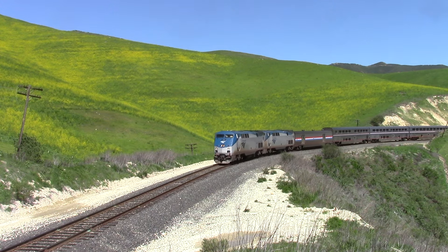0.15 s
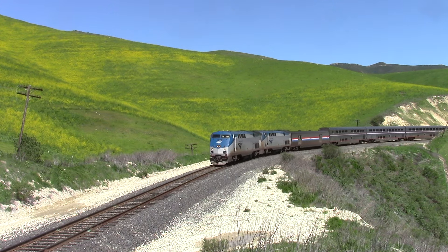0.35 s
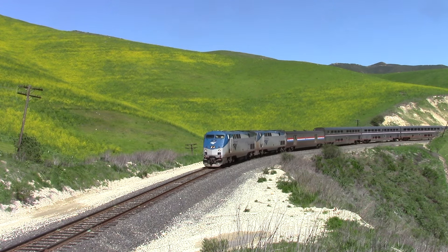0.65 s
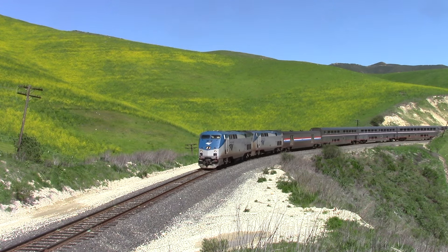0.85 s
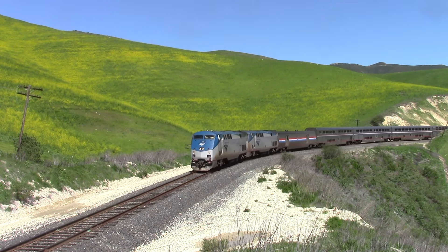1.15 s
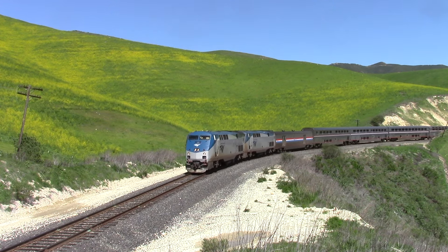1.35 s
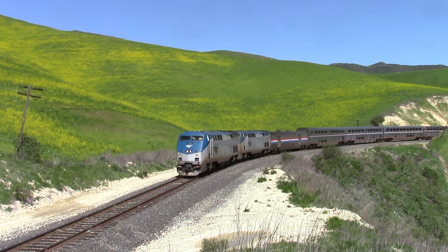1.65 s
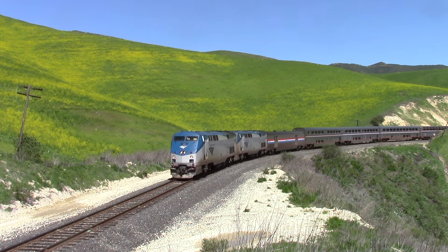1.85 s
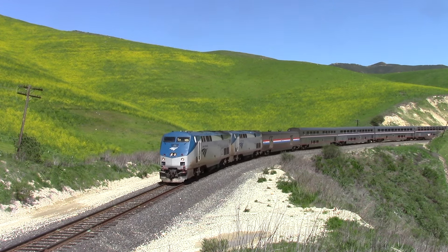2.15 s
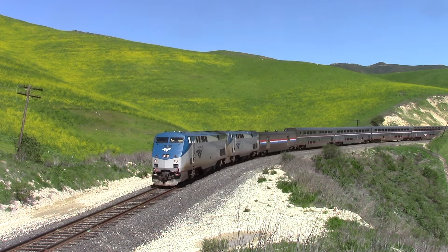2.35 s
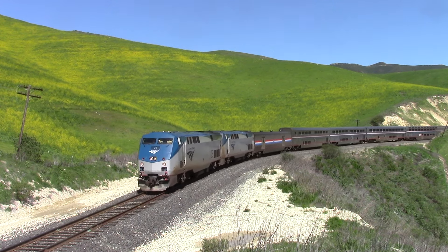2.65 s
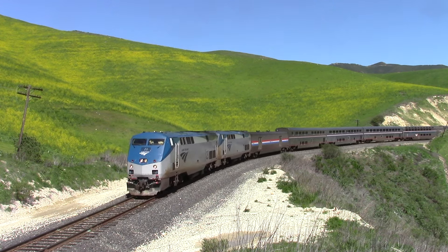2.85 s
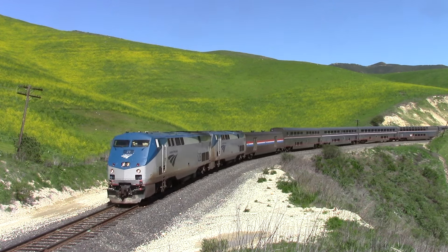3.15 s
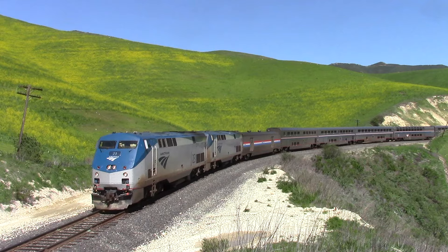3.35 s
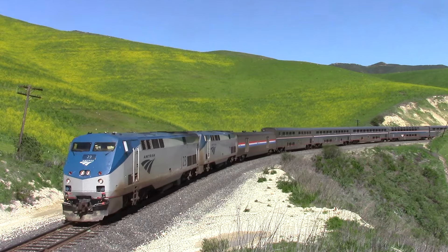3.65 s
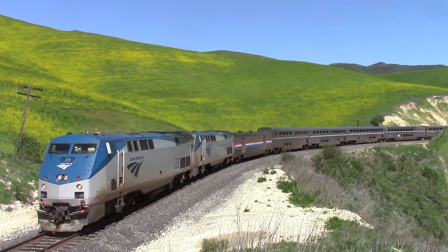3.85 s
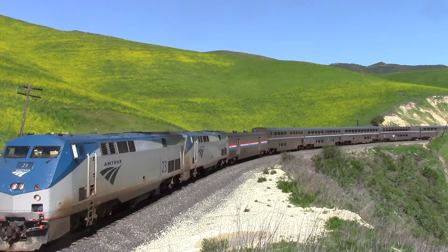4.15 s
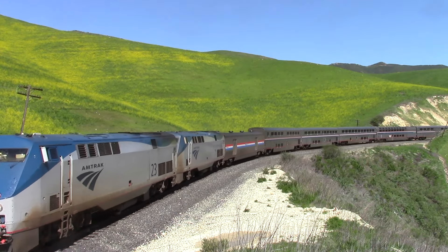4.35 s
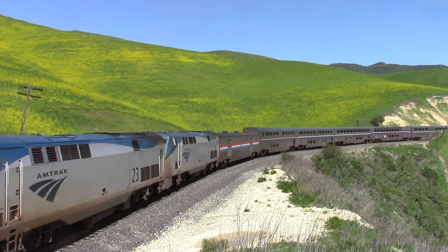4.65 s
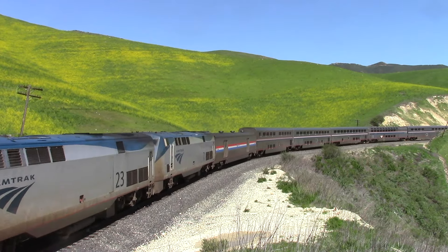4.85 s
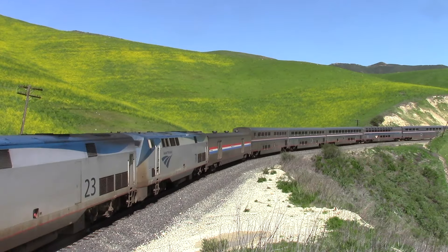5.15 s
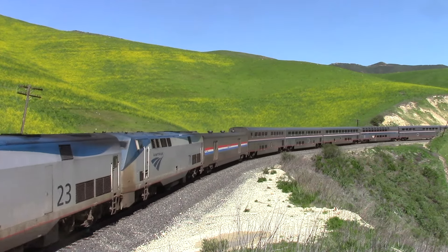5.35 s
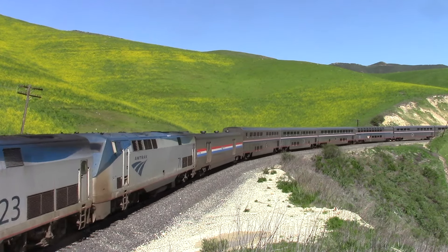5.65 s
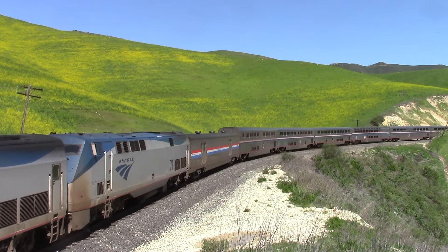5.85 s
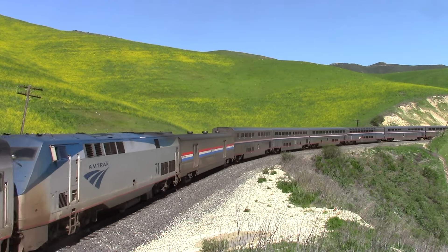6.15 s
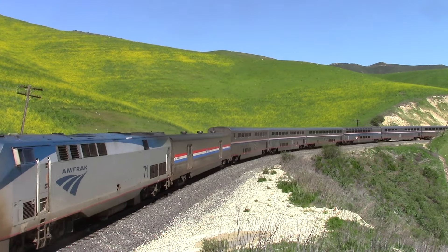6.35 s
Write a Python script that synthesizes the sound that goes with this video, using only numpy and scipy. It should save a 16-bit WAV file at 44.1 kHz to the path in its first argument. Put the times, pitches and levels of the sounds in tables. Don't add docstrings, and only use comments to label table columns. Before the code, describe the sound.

Outdoors beside a curved track, a long passenger train approaches and passes. Steel wheels squeal in overlapping, wavering tones over a hissing roll and faint diesel throb. A bright bell tolls about once a second, axles thud over a joint near the middle, the squeal peaks, then a blower whines by with sharp air spits. Close stereo camera microphones, treble slightly spread.

```python
import sys
import numpy as np
from scipy import signal
from scipy.fft import rfft, irfft
from scipy.io import wavfile
from scipy.ndimage import uniform_filter1d

SR = 44100
rng = np.random.default_rng(int(sys.argv[2]) if len(sys.argv) > 2 else 0)


def store_pcm(level_fs):
    pcm = np.round(np.clip(level_fs, -1, 1) * 32767).astype(np.int16)
    wavfile.write(sys.argv[1], SR, np.atleast_2d(pcm).T)


def linear_from_db(decibels):
    return 10 ** (np.asarray(decibels, float) / 20)


N = 286650
T = np.arange(N) / SR
FREQ = np.fft.rfftfreq(N, 1 / SR)

# t/s, roar level/dB, brightness/dB per octave
APPROACH = [(0.0, -44, 1), (.35, -43.5, 1), (.56, -45, 1), (.85, -44.5, 4), (1.16, -36, 2.5),
            (2.26, -36.5, 2.5), (3.04, -38, 1.5), (3.4, -37.5, 1), (3.76, -32, -0.7), (3.87, -33.5, 0.1),
            (4.42, -29.5, -0.9), (4.6, -37, 0), (4.8, -35, -0.35), (4.98, -35.5, -1.5), (5.27, -33.5, -3),
            (5.72, -31.5, -3.5), (6.08, -33, -3), (6.3, -29, -3.5), (6.5, -27, -3.5)]
# t/s, share 0-1
ALONGSIDE = [(4.6, 0.25), (5.2, 0.43), (5.8, 0.74), (6.5, 0.56)]
# f/Hz, level/dB per Hz
ROAR_COLOUR = [(15, -70), (25, -59), (277, -7.5), (405, -9), (818, -6.5), (1330, -7), (1940, -2.5),
               (2350, -4.5), (3920, -4.5), (4610, -9), (7920, -11.5), (11600, -20), (13600, -23),
               (16000, -40)]
# f/Hz, width/Hz, level/dB
ROAR_MODES = [(285, 69, 3), (827, 47, 6), (1080, 106, 3), (2495, 18, 6.5), (4300, 48, 4), (5973, 70, 8),
              (7040, 91, 7), (7970, 230, 5), (9030, 1400, 2.5), (10240, 18, 9.5)]
WHEEL_RING_HZ = [549, 3350, 3688, 1676, 1974, 1980, 1936, 2922, 2911, 3980, 3932, 5291, 6652, 7202, 9185,
                 9010, 8230, 1903]
# spread of the other wheels below 0-1, roughness, skirt minus tone/dB, skirt hum over the roar/dB
WHEELS = [(0.0524, .9, -5, -13), (.045, .2, 1.5, -10), (0.04, 1.18, -2.5, -10), (0.0666, 0.26, -2, -5),
          (.045, .4, 1, -20), (0.045, 0.78, 6, -7), (0.04, 1.26, -0.5, -12), (0.03, 1.32, 0, -1),
          (0.06, 0.11, -8.5, 0), (.065, 0.24, -1, -1), (.06, .6, 2, -6.5), (0.062, 0.27, 3.5, 0.5),
          (0.08, 0.96, -10, -20), (0.048, 0.13, 3.5, -12), (0.064, 0.44, 1.5, -7), (0.0543, 0.67, 6, -6),
          (0.16, 1.2, 6, -10), (0.03, 0.37, -4.5, -17)]
# full from t/s, hold/s, tone level/dB,
# rise/s per 10 dB, fall/s per 10 dB (signs of the last two do not matter)
LOW_GRIPS = [
    [(1.3, 0.094, -42, 5.16, 5), (2.09, 0.022, -36.5, 0, 0), (3.31, 0.018, -37, -1.4, 0.6),
     (4.11, .02, -36.5, -0.5, 0), (5.5, 0.051, -45, 0.7, -5.53)],
    [(.42, .05, -46, .1, .05), (.665, .05, -31, .02, .1), (.885, .02, -35, .03, .05),
     (1.04, .02, -38, .1, .05), (1.18, .02, -36, .1, .1)],
    [(4.12, .02, -28, .06, .06), (4.3, .14, -31, .08, .06), (4.65, .05, -34, .05, .05),
     (4.8, .05, -33, 0, .1), (5.04, 0.032, -23.5, 0.07, 0.14)],
    [(.16, .04, -40, .03, 3), (.33, 0.12, -34, .06, -2.5), (.62, 0.035, -30, .04, 1),
     (.7, 0.054, -27.5, .08, 0.3), (.86, 0.12, -28, .15, .1), (1.0, 0.04, -29.5, .06, 0.1)],
    [(.0, .08, -39, .1, .1), (.13, .18, -36, .06, .06), (.4, .05, -38, .05, .03)],
    [(1.54, 0.46, -32, -0.1, -0.1), (2.24, .02, -39, 0, 0), (2.49, 0.045, -38.5, -0.5, 0),
     (3.0, 0.196, -42, 0.17, -1), (3.6, 0.14, -31.5, 0.1, .1), (3.9, .02, -29, 0.06, .06)],
]
MID_GRIPS = [
    [(3.75, .02, -28.5, 0.13, .05), (3.92, 0.0096, -22.5, 0.085, 0.058), (4.16, .01, -27, 0.15, 0.144),
     (4.38, 0.0098, -22, 0.065, 0.1), (4.96, .01, -29, 0.242, 0.121), (5.75, 0.0197, -30, 0.17, 0.031),
     (6.16, 0.029, -27.5, 0.2, 0.43)],
    [(.2, 0.018, -37, 0.13, .02), (.35, 0.0089, -33, 0.057, 0.093), (.9, 0.23, -37.5, .03, 0.38),
     (1.84, 0.0085, -25, 0.34, 0.093), (2.265, 0.025, -14.5, 0.031, 0.047), (2.8, 0.019, -21.5, 0.15, .08),
     (2.97, 0.051, -20.5, 0.13, 0.059), (3.31, 0.018, -33, 0.33, 0.062), (3.76, .02, -30.5, 0.345, 0.082),
     (4.08, 0.0204, -39, 0.34, 0.044)],
    [(4.374, 0.049, -14, 0.051, .1), (4.46, 0.018, -8.5, 0.083, 0.071), (4.618, 0.016, -15.5, 0.17, 0.13),
     (4.83, 0.011, -18, 0.119, 0.1), (4.96, 0.017, -26.5, .1, 0.036), (5.078, 0.144, -24.5, 0.062, 0.122),
     (5.412, .01, -28.5, 0.077, 0.053), (5.65, 0.0079, -22.5, 0.095, 0.031), (5.78, .04, -33, .1, .2),
     (6.3, .1, -37, .1, .2)],
]
MAIN_GRIPS = [
    [(.16, .02, -36, 0.12, 0.29), (.78, 0.068, -38, .05, .04), (1.1, 0.2, -28.5, 0.044, 0.12),
     (2.04, 0.016, -21.5, 0.48, 0.11), (2.6, 0.357, -13, 0.089, 0.17), (3.21, .23, -20.5, 0.18, 0.22),
     (5.08, 0.019, -27.5, 0.198, 0.049), (5.41, .01, -29.5, 0.28, 0.17)],
    [(3.72, 0.031, -32, 0.17, 0.092), (4.03, .1, -30, 0.11, 0.088), (4.2, 0.068, -30, 0.073, .1),
     (4.4, .06, -30, .1, .06), (5.894, 0.0196, -33, 0.17, 0.25), (6.062, .29, -25.5, 0.029, 0.052),
     (6.48, 0.034, -27, 0.27, 0.088)],
    [(1.25, 0.11, -30, 0.085, .3), (1.8, 0.022, -22, 0.43, 0.146), (2.0, 0.0081, -21, 0.16, 0.079),
     (2.65, 0.293, -28, 0.12, .1), (3.03, 0.0108, -24.5, 0.22, 0.11), (3.24, 0.0079, -25, 0.11, 0.055),
     (3.55, .01, -24.5, 0.27, 0.22), (4.06, 0.0098, -28, 0.19, 0.078), (4.3, 0.044, -43, .2, .15)],
]
HIGH_GRIPS = [
    [(1.5, .05, -37.5, .1, .1), (1.78, 0.19, -36, .05, .05), (2.41, .01, -28, .25, 0.17),
     (2.72, .02, -30, .06, .05), (3.2, .05, -37, .2, .1), (3.45, .05, -37, .1, .05),
     (3.6, .02, -33, .05, .06)],
    [(0.0, 0.46, -50, .1, 0.093), (2.908, .02, -27.5, 0.31, 0.55), (3.85, 0.047, -39.5, 0.099, .05)],
    [(0.0, 0.226, -53.5, .1, .1), (.87, .02, -29, .04, 0.214), (.98, 0.146, -22, 0.098, 0.17),
     (1.168, 0.0346, -16.5, 0.028, 0.036), (1.27, .02, -27.5, .03, 0.22)],
    [(2.932, .02, -30.5, .2, 0.207), (3.226, .01, -29.5, 0.19, 0.1), (3.55, 0.04, -34, 0.29, 0.214)],
    [(.9, 0.096, -31.5, 0.035, 0.25), (1.23, .2, -35, 0.155, .1)],
    [(3.66, .15, -31, .1, 0.17), (3.98, 0.23, -31.5, .1, .1), (4.36, .1, -25.5, .08, .1),
     (4.62, .4, -35.5, .1, .1), (5.7, .08, -31, 0.055, .1), (6.08, .3, -30, .08, .2)],
]
FLANGE_HZ = [12720, 13200, 13600, 14117, 14161, 14600, 15150]
# width/Hz, level/dB
FLANGE_MODES = [(40, -15), (30, -11), (1000, 0), (14, -10), (14, -10), (1000, -8), (25, -26)]
# full from t/s, hold/s, level/dB
RUBS = [(0.0, .01, -31.5), (0.269, 0.028, -29.5), (.4, .02, -37), (0.544, 0.0185, -30), (.7, .02, -34),
        (0.847, 0.13, -33.5), (1.07, 0.058, -29), (1.283, 0.302, -24), (1.84, 0.38, -24.5),
        (2.35, .04, -29.5), (2.592, .02, -29), (2.777, 0.018, -35), (2.9, .02, -32), (3.3, 0.315, -33),
        (3.76, .02, -35), (4.05, .3, -30.5), (4.44, .02, -28), (4.72, .02, -44.5), (5.05, .02, -38),
        (5.8, 0.114, -39), (6.335, 0.042, -25), (6.5, .01, -28)]
# t/s, level/dB
DRONE = [(0.0, -51.5), (0.27, -50), (0.42, -57.5), (1.34, -40.5), (1.52, -49.5), (1.66, -46.5), (3.08, -48),
         (3.78, -42.5), (3.87, -43.5), (4.07, -40), (4.67, -56.5), (5.47, -54), (5.54, -50), (5.68, -61),
         (6.5, -42)]
# t/s, peak level/dB, strike note f/Hz, brightness/dB
STROKES = [
    (2.345, -21, 2200, 0.5),
    (2.974, -20, 2185, 5),
    (3.89, -22, 2170, 7),
    (4.755, -20, 2176, 4),
    (5.662, -20.5, 2140, 5.5),
]
# ratio to the strike note, level/dB, t60/s
BELL_PARTIALS = [(.42, -14, 11), (1, 1.5, 1.04), (1.006, -2.5, 0.524), (1.02, -5.5, 0.47),
                 (1.74, -5, 0.203), (2.5, -11.5, .3), (2.6, -8, .25), (2.68, -10, .2), (3.2, -9, .2),
                 (3.7, -11, 0.58), (4.9, -18.5, .2)]
# t/s, peak level/dB, centre f/Hz
THUDS = [
    (3.221, -16.5, 318),
    (3.74, -17, 309.5),
    (3.96, -22, 250),
    (3.995, -15, 300),
    (4.08, -11.5, 279.5),
    (4.15, -16.5, 332),
    (4.95, -18, 632),
]
# t/s, f/Hz, level/dB
BLOWER = [
    (4.9, 812, -43),
    (5.3, 805.6, -35),
    (5.55, 803, -35),
    (5.75, 800, -31.5),
    (6.05, 792, -23),
    (6.13, 788, -30.5),
    (6.3, 778, -25),
    (6.5, 772, -25),
]
# t/s, length/s, level/dB, low f/Hz, high f/Hz
SPITS = [
    (5.021, 0.096, -24.5, 4500, 9330),
    (5.769, 0.08, -21.5, 4000, 8500),
    (5.862, 0.073, -24.5, 4600, 8400),
    (6.144, .04, -39, 9000, 13000),
    (6.3, .03, -36, 9300, 10100),
    (6.28, 0.142, -30.5, 5000, 11000),
]
# f/Hz, width/Hz, level/dB
NOZZLE = [(5160, 500, 5), (5870, 300, 5), (6900, 250, 7), (7950, 250, 2), (9800, 300, 4)]
# f/Hz, level/dB
SCATTER = [(500, -87), (2500, -29.5), (4400, -20), (7500, -56), (9500, -6.5), (11500, -6.5), (15500, -4)]


def unit(x):
    return x / np.sqrt(np.mean(x ** 2) + 1e-30)


def on_log(points, hz):
    f, db = np.transpose(points)
    return np.interp(np.log(np.maximum(hz, 1)), np.log(f), db)


def coloured(x, db):
    return irfft(rfft(x) * linear_from_db(db), N)


def resonances(modes):
    return sum(db / (1 + (2 * (FREQ - f) / w) ** 2) for f, w, db in modes)


def walk(rate, size):
    k = int(SR / rate / 32)
    held = np.repeat(rng.standard_normal(size // (32 * k) + 2), k)
    slow = 1.3 * uniform_filter1d(uniform_filter1d(held, k), k)
    return np.interp(np.arange(size) / 32, np.arange(len(slow)), slow)


def ring(x, hz, width_hz):
    r, turn = np.exp(-np.pi * width_hz / SR), 2 * np.pi * hz / SR
    return signal.lfilter([0, r * np.sin(turn)], [1, -2 * r * np.cos(turn), r ** 2], x)


def band(x, low_hz, high_hz, order=2):
    edges = [low_hz, min(high_hz, .45 * SR)]
    return signal.sosfilt(signal.butter(order, edges, "band", fs=SR, output="sos"), x)


def approach(t, octaves):
    s, db, tilt = np.transpose(APPROACH)
    return np.interp(t, s, db + octaves * tilt)


def grips(rows, t):
    s, hold, db, rise, fall = np.transpose(rows)[:, :, None]
    coarse = t[::44]
    before = np.maximum((s - coarse) / np.abs(rise), 0)
    after = np.maximum((coarse - s - hold) / np.abs(fall), 0)
    power = np.sum(linear_from_db(2 * (db - 10 * (before + after))), axis=0)
    return np.interp(t, coarse, power)


def roar(swell_db=0.84, flicker_db=1.2):
    pivot_hz, foot_hz, top_hz = 1335, 324, 10950
    bass_share, per_hz_db = 0.2, -19
    colour = on_log(ROAR_COLOUR, FREQ) + resonances(ROAR_MODES)
    noise = rfft(rng.standard_normal(N)) * linear_from_db(colour) * np.sqrt(SR / 2)
    noise = noise / (1 + (110.5 / np.maximum(FREQ, 1)) ** 2)
    place = 3 * np.log2(np.maximum(FREQ, 1))
    out, swell = 0, walk(2.92, N)
    for k in range(13, 43):
        third = irfft(noise * np.cos(np.pi / 2 * np.clip(place - k, -1, 1)) ** 2, N)
        octaves = np.log2(np.clip(2 ** (k / 3), foot_hz, top_hz) / pivot_hz)
        if octaves < 0:
            octaves = octaves * bass_share
        db = approach(T, octaves) + per_hz_db
        out = out + third * linear_from_db(db + swell_db * swell + flicker_db * walk(9, N))
    return out


def squeal(hz, spread, rough, skirt_db, hum_db, rows, count=10, wobble_hz=45, overlap=1.26, patchy_db=3.0, taper_db=3.5):
    start, end = rows[0][0] - .3, rows[-1][0] + rows[-1][1] + .35
    a, b = max(int(start * SR), 0), min(int(end * SR), N)
    t, size = T[a:b], b - a
    drift = 2 * np.pi * np.cumsum(hz * (1 + 0.00063 * walk(6, size))) / SR
    grip = grips(rows, t)
    rough = rough + 1 - (grip / grip.max()) ** 0.11
    shake = np.exp(rough * (0.16 * walk(wobble_hz, size) + 1.2j * walk(wobble_hz, size)))
    tone = unit((shake * np.exp(1j * drift)).real)
    position = (np.arange(count) + rng.random(count)) / count
    lower = hz * (1 + .08 * spread - 1.08 * spread * position ** 1.1)
    width_hz = overlap * spread * hz / count
    skirt = 0
    for k, f in enumerate(lower):
        other = unit(ring(ring(rng.standard_normal(size), f, width_hz), f, 3 * width_hz))
        skirt = skirt + other * linear_from_db(patchy_db * walk(8, size) - taper_db * k / count)
    hum = linear_from_db(2 * (approach(t, 0) + hum_db))
    skirt = unit(skirt) * np.sqrt(grip * linear_from_db(2 * skirt_db) + hum)
    fade = np.clip(np.minimum(t - start, end - t) / .15, 0, 1)
    out = np.zeros(N)
    out[a:b] = fade * (np.sqrt(grip) * tone + skirt)
    return out


def flange():
    rise_s, fall_s, hum_db, hum_octaves = 0.12, 0.054, -3.5, 3.4
    rub = rng.standard_normal(N) * linear_from_db(1.7 * walk(14, N))
    singing = np.clip((4.7 - T) / .2, .1, 1)
    modes = 0
    for f, (w, db) in zip(FLANGE_HZ, FLANGE_MODES):
        mode = linear_from_db(db + 2.3 * walk(3.28, N)) * unit(ring(ring(rub, f, w), f, 2 * w))
        modes = modes + mode * (singing if w < 200 else 1)
    grip = grips([(*row, rise_s, fall_s) for row in RUBS], T)
    hum = linear_from_db(2 * (approach(T, hum_octaves) + hum_db))
    return unit(modes) * np.sqrt(grip + hum)


def drone():
    level_db = np.interp(T, *np.transpose(DRONE)) + 1.4 * walk(4.6, N)
    return unit(band(rng.standard_normal(N), 96.0, 264.0)) * linear_from_db(level_db)


def bell():
    out = np.zeros(N)
    for s, db, hz, bright_db in STROKES:
        a = int(s * SR) + 1
        t = T[a:a + SR] - s
        for ratio, part_db, t60 in BELL_PARTIALS:
            size = linear_from_db(db + part_db + bright_db * (ratio > 1.5) - 60 * t / t60)
            smear = 0.37 * ratio * walk(60 * ratio, len(t))
            size = size * (1 + .15 * walk(38, len(t)))
            envelope = size * (1 - t) * (1 - np.exp(-t / 0.0042))
            out[a:a + SR] += envelope * np.sin(2 * np.pi * hz * ratio * t + smear)
    return out


def thuds():
    out = np.zeros(N)
    for s, db, hz in THUDS:
        away = np.abs(T - s)
        blow = np.where(T > s, np.exp(-away / 0.0207), np.exp(-away / 0.0031))
        ballast = 0.24 * np.exp(-away / 0.087)
        push = rng.standard_normal(N) * (blow + ballast)
        knock = band(push, 0.67 * hz, 1.46 * hz)
        out += linear_from_db(db) * knock / np.abs(knock).max()
    return out


def blower():
    s, hz, db = np.transpose(BLOWER)
    turn = 2 * np.pi * np.cumsum(np.interp(T, s, hz)) / SR
    whine = 0
    for ratio, line_db, steady in [(1, -10.5, 2.1), (1.036, -10.5, 1.4), (1.075, -13, .3), (1.12, -10, .4)]:
        wander = steady + walk(18, N) + 1j * walk(18, N)
        whine = whine + linear_from_db(line_db) * wander * np.exp(1j * ratio * turn)
    return unit(whine.real) * linear_from_db(np.interp(T, s, db)) * np.clip((T - s[0]) / 0.19, 0, 1)


def spits():
    pipes_db = resonances(NOZZLE)
    out = 0
    for s, length, db, low_hz, high_hz in SPITS:
        gate = np.clip(np.minimum((T - s) / .01, (s + length - T) / 0.1 + 1), 0, 1)
        sag_db = 3.7 * np.clip((T - s) / length, 0, 2)
        hiss = unit(band(coloured(rng.standard_normal(N), pipes_db), low_hz, high_hz))
        out = out + gate * linear_from_db(db - sag_db + 1.8 * walk(40, N)) * hiss
    return out


def ground_scatter(x):
    echoes = rng.standard_normal((2, 2048)) * np.exp(-np.arange(2048) / 260.0)
    turn = 2 * np.pi * 1.5 * T
    out = 0
    for share, echo in zip((np.cos(turn), np.sin(turn)), echoes):
        out = out + share * signal.fftconvolve(x, echo / np.sqrt(np.sum(echo ** 2)))[:N]
    return out


def scene():
    all_grips = LOW_GRIPS + MID_GRIPS + MAIN_GRIPS + HIGH_GRIPS
    wheels = sum(squeal(hz, *wheel, rows) for hz, wheel, rows in zip(WHEEL_RING_HZ, WHEELS, all_grips))
    scrape, air = flange(), spits()
    mid = roar() + wheels + scrape + drone() + bell() + thuds() + blower() + air
    scatter = ground_scatter(mid + 1.68 * air)
    wide = np.interp(T, *np.transpose(ALONGSIDE)) * 0.38 * band(scatter, 5060.0, 9400.0, order=3)
    side = coloured(scatter, on_log(SCATTER, FREQ)) + wide
    side = side - 0.53 * band(scrape, 3000., 19000.) - .08 * band(wheels, 8300., 10000.)
    return np.array([mid + side, mid - side])


def top_cut(x):
    return signal.sosfilt(signal.butter(12, 17040, fs=SR, output="sos"), x)


def record(dry):
    top_hz, bass_hz = 15760, 75.0
    passband = (FREQ < top_hz) / np.sqrt(1 + (bass_hz / np.maximum(FREQ, 1)) ** 2)
    rounded = dry / (1 + (dry / .92) ** 4) ** .25
    mix = irfft(rfft(rounded) * passband, N)
    return top_cut(mix)


dry = scene()
out = record(dry)
store_pcm(out)
```